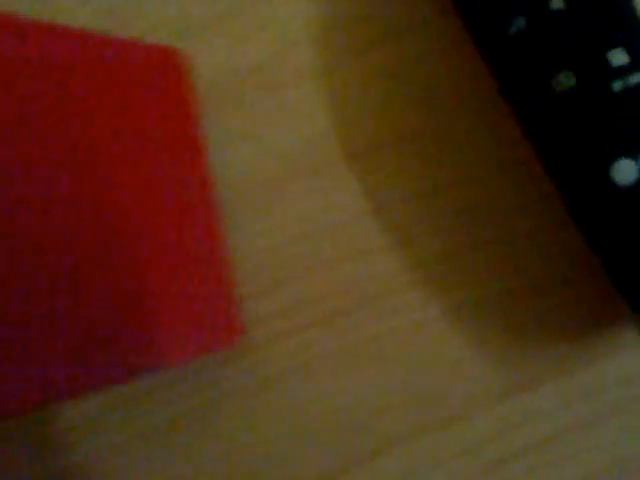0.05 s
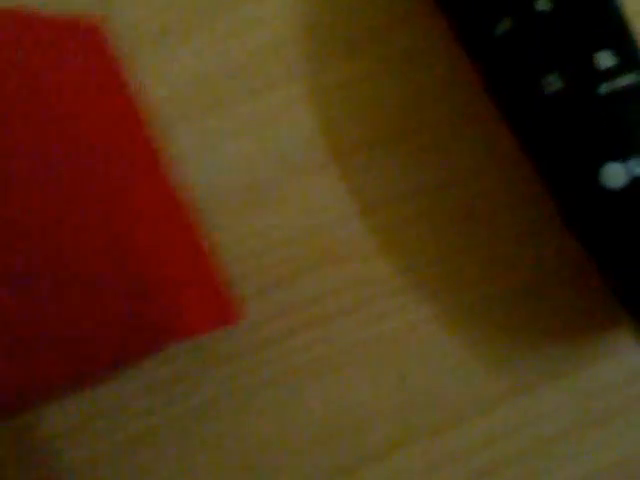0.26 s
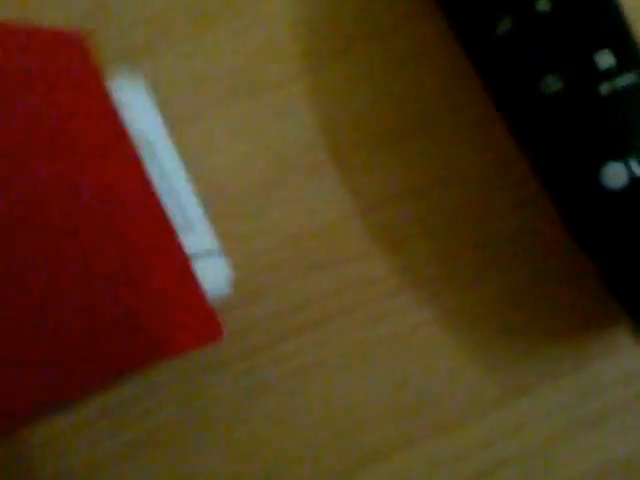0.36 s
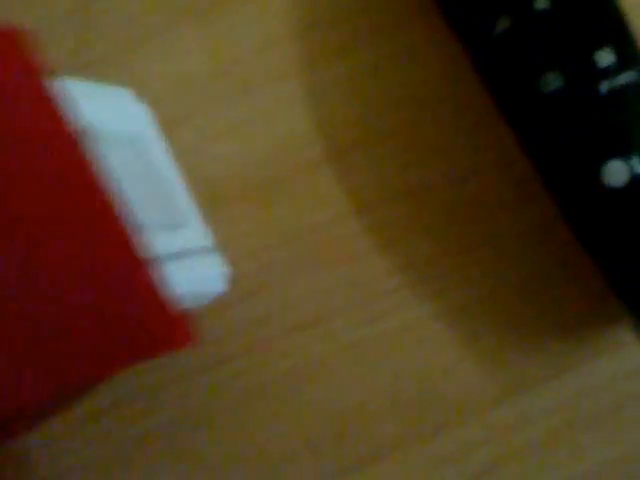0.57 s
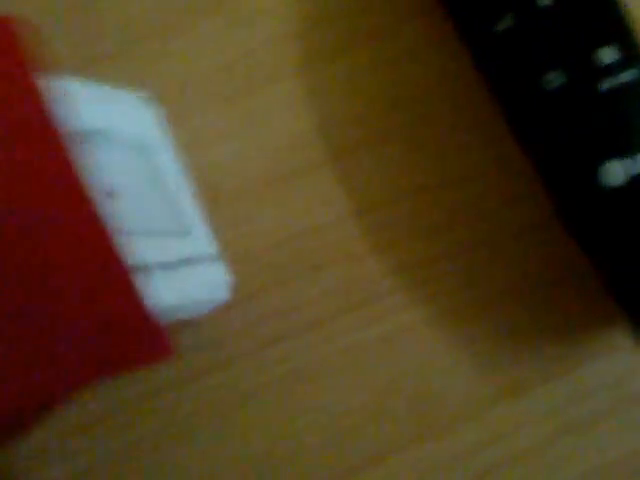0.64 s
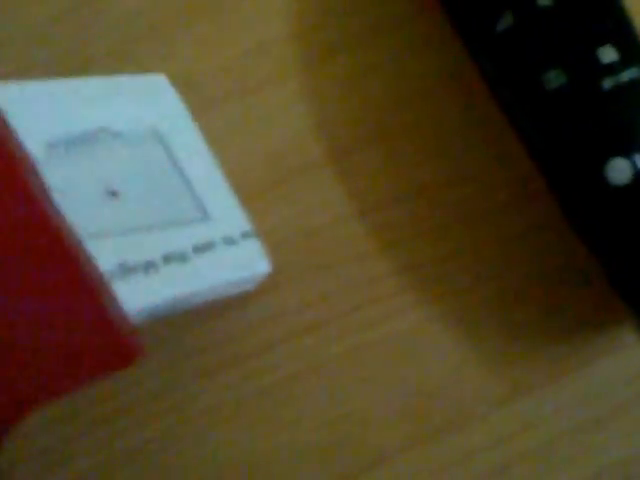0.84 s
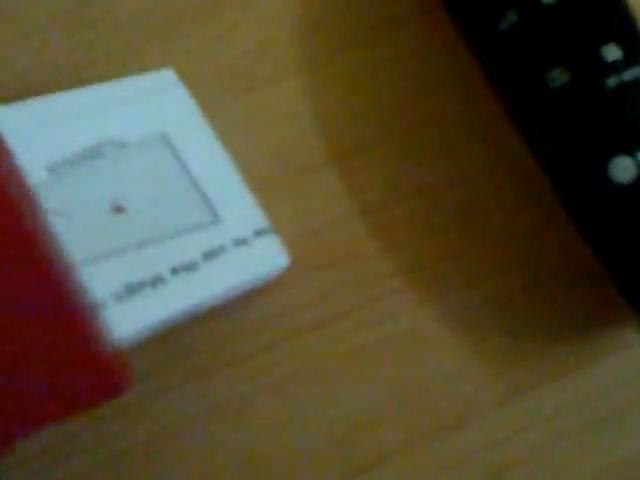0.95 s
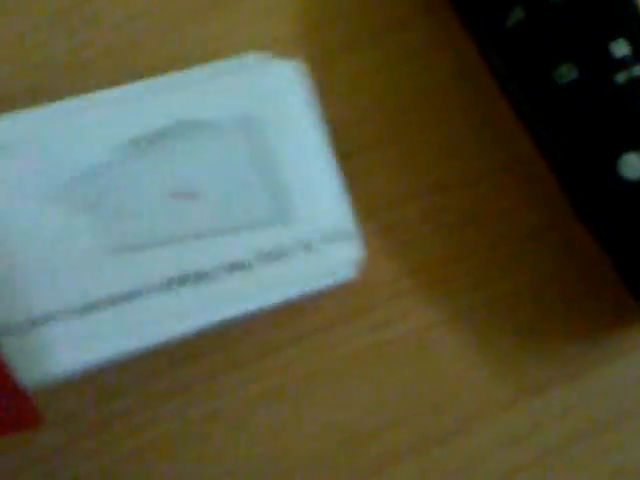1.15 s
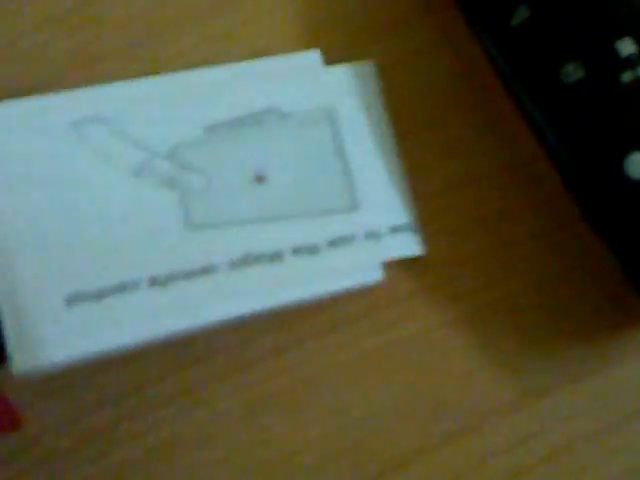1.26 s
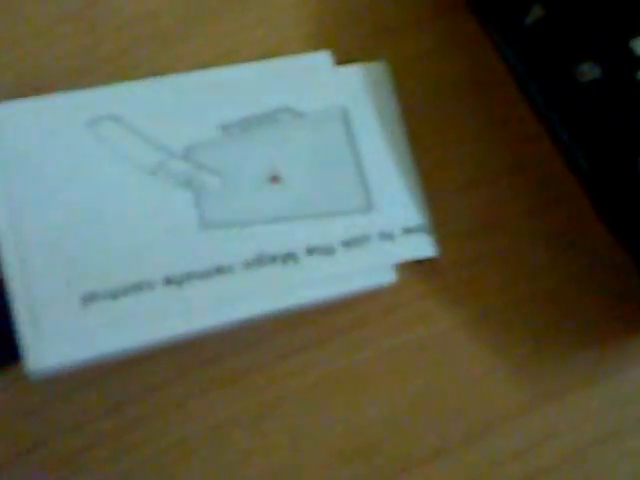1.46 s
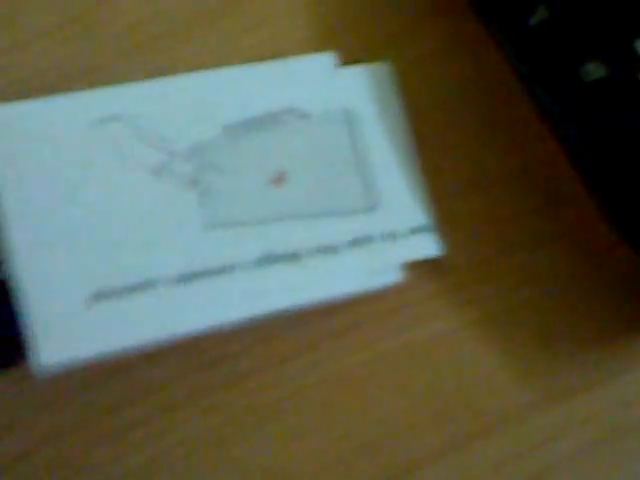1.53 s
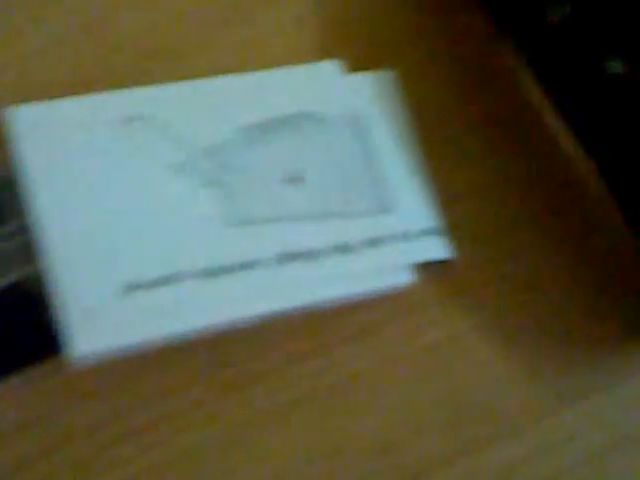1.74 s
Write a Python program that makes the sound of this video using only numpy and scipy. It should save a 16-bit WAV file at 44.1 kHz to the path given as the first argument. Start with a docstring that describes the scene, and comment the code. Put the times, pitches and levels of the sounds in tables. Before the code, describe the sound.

Hollow knocks come close to the microphone as a small holder is shifted and set down on a wooden tabletop. A card rustles between them and finishes with a few sharp ticks, over faint handling rumble in a quiet room.

```python
"""A quiet room, close to a wooden table: a small hard holder is shifted and set down while a card is
drawn out of it. Each knock is a crack at the contact, a clack and hollow ring of the holder, and a
ring of the table top. Between the knocks the card slides with a grainy rustle and its edges tick.
Low handling rumble and room tone lie underneath, and a short room tail follows the action."""
import sys
import numpy as np
from scipy import signal
from scipy.fft import rfft, irfft
from scipy.io import wavfile
from scipy.ndimage import uniform_filter1d

SR = 44100
rng = np.random.default_rng(int(sys.argv[2]) if len(sys.argv) > 2 else 0)


def transcribe(signal):
    """Save signal, clipped to [-1, 1], as a 16-bit WAV file at the path in sys.argv[1]."""
    frames = np.atleast_2d(signal).T
    limited = np.clip(frames, -1, 1)
    pcm = np.round(limited * 32767).astype(np.int16)
    wavfile.write(sys.argv[1], SR, pcm)


N = 79380

# The holder's hits on the table. Each row: start in seconds, hollow ring level in dB, its pitch in Hz,
# ring length as a multiple of the free ring, table gain in dB, wash gain in dB, clack gain in dB,
# clack tilt in dB per octave, crack gain in dB, top of the crack in Hz.
HOLDER_HITS = [(0.0661, -39, 636, .6, -45, -46, -20, 11, -22.5, 3950),
               (0.2515, -37, 620, 0.82, -26.5, -46, -19.5, 7, -21, 5000),
               (0.2735, -14, 712, 0.14, -44, -65, -47, -18, -61, 2500),
               (0.2943, -12.5, 667.6, 0.98, -13, -21, -7.5, -0.5, -11.5, 4800),
               (0.3066, -6, 653, 0.86, -17.5, -22.5, 1, 5.5, -10, 4800),
               (0.3780, -31, 654, 1.2, -33, -55, -25.5, 20.5, -24, 4240),
               (0.4045, -11.5, 710, 0.14, -16, -45, -25.5, -41, -23.5, 2500),
               (0.5303, -10.5, 663, 0.27, -27, -31, -5.5, -10, -11.5, 4200),
               (0.5428, -11.5, 595, 0.22, -6.5, -28.5, -24, 28, -14, 5100),
               (0.6145, -26, 632, 0.38, -25, -39, -22.5, -9, -28, 4000),
               (0.6785, -24.5, 659, 0.96, -27, -41, -32, -16.5, -34, 3900),
               (0.7738, -24, 752, 0.46, -28.5, -30.5, -20.5, 0, -31.5, 4780),
               (0.7985, -29.5, 728, 0.41, -38, -45, -25, -9, -30, 9000),
               (0.8790, -31.5, 694, 0.98, -29, -17.5, -26, -4, -17.5, 4400),
               (0.8853, -18, 720, 0.36, -18.5, -30, -8, 3.5, -3, 9000),
               (0.9070, -29, 690, 0.21, -15, -37, -7, 4, -2.5, 6100),
               (0.9665, -9.5, 679.3, 0.78, -14, -28.5, -7.5, 3, -26, 4500),
               (1.0100, -8.5, 672.4, 0.44, -7, -25.5, -3, 3, -16.5, 5200),
               (1.2592, -38.5, 650, 0.71, -52, -40, -23, 5.5, -29, 4900),
               (1.2922, -59, 610, 0.52, -45, -37.5, -30.5, -25.5, -34, 3920),
               (1.3245, -37, 690, 0.33, -29, -56, -25.5, -3, -26.5, 3820),
               (1.4045, -20.5, 676, 0.64, -28, -38, -22, 10.5, -41, 4060)]
def knocks():
    """Each hit sounds holder and table together; grip and position change the ring's pitch and length."""
    out = np.zeros(N)
    for s, hollow_db, hz, length, table_db, wash_db, clack_db, tilt_db, crack_db, top_hz in HOLDER_HITS:
        add(out, s, from_db(hollow_db) * hollow_ring(hz, length))
        add(out, s, from_db(table_db) * table_ring(length))
        add(out, s, from_db(wash_db) * table_wash())
        add(out, s, from_db(clack_db) * holder_clack(tilt_db))
        add(out, s, from_db(crack_db) * contact_crack(top_hz))
    return out


# The holder's short, hard modes. Each row: pitch in Hz, relative level in dB, t60 in seconds.
HOLDER_MODES = [(1140, -3.5, 0.006), (1213, 10.5, 0.017), (1377, 4, 0.022), (1556, 2.5, 0.022),
                (1726, -6.5, 0.045), (2017, 5, 0.016), (2330, -9.5, 0.043), (2905, -11, .016),
                (3333, -14, 0.0047)]
def holder_clack(tilt_db):
    """The hard shell clacks, its modes landing a little off pitch at every blow."""
    return .5 * struck(HOLDER_MODES, tilt_db, detune=0.036)


def hollow_ring(hz, length, rise_s=0.0021, free_t60=0.17):
    """The holder's hollow rings on a single note."""
    t = np.arange(SR // 2) / SR
    return np.sin(2 * np.pi * hz * t) * np.minimum(t / rise_s, 1) * decay(t, free_t60 * length)


def contact_crack(top_hz, attack_s=0.00027, hold_s=.002, t60=0.011):
    """A few milliseconds of bright chatter as two hard faces meet."""
    t = np.arange(SR // 20) / SR
    chatter = rng.standard_normal(len(t)) * np.minimum(t / attack_s, 1) * decay(t - hold_s, t60)
    bright = butter(chatter, 2270, "high")
    return rms_one(butter(bright, top_hz, "low", order=3)) / 10


# The table top's modes. Each row: pitch in Hz, relative level in dB, free-ringing t60 in seconds.
TABLE_MODES = [(74.1, -24, 0.68), (159.6, -15.5, 0.13), (262.8, -19, 0.42), (336, -15.5, 0.17),
               (385.7, -14, 0.25), (499, -12, 0.055), (730.5, -10.5, 0.21), (824, -8, 0.14),
               (917, -13, 0.19), (1113, -14.5, 0.12), (1162, -11, 0.18), (1413, -15.5, 0.123),
               (1541, -12, 0.16), (1866, -11, 0.161), (1900, -18, 0.084)]
def table_ring(length):
    """The wooden top rings under the blow and gives the knock its body."""
    return struck(TABLE_MODES, length=length)


# The colour of the table's dense modes. Each row: frequency in Hz, relative level in dB.
WASH_COLOUR = [(100, -27.5), (250, -19.5), (550, -1.5), (900, -4), (1200, 5.5), (1600, -9), (2000, -1.5),
               (2600, -8.5), (3100, -11), (6000, -27), (12000, -64)]
def table_wash(attack_s=0.01, t60=0.31):
    """The table's many overlapping modes build up and die away together."""
    t = np.arange(SR // 2) / SR
    wood = coloured(rng.standard_normal(len(t)), WASH_COLOUR)
    return wood * np.minimum(t / attack_s, 1) * decay(t, t60)


def struck(modes, tilt_db=0, length=1, detune=0, pivot_hz=1490, spread_db=1.5, contact_s=0.00059):
    """A struck body: decaying modes of alternating sign, balanced a little differently at every blow."""
    t, out = np.arange(SR // 2) / SR, 0
    for k, (hz, db, t60) in enumerate(modes):
        gain = from_db(db + tilt_db * np.log2(hz / pivot_hz) + spread_db * rng.standard_normal())
        pitch = hz * (1 + detune * rng.standard_normal())
        out = out + (-1) ** k * gain * np.sin(2 * np.pi * pitch * t) * decay(t, t60 * length)
    return out * np.minimum(t / contact_s, 1)


# The card's edge ticks. Each row: start in seconds, snap peak in dB, resonance in Hz,
# t60 of grit and fizz in seconds, fizz level in dB against the peak.
EDGE_TICKS = [(0.0350, -34, 3500, .015, -32), (0.1505, -23, 4030, 0.017, -46.5),
              (0.2906, -12, 3840, 0.016, -48), (0.4338, -17.5, 5300, 0.0088, -17),
              (0.4905, -23.5, 2300, 0.028, -32), (0.5896, -29, 4750, 0.035, -12.5),
              (0.667, -37, 3540, .015, -36), (0.7986, -12.5, 4950, 0.018, -24.5),
              (0.8848, -21, 7000, 0.003, -1), (0.8985, -13, 7000, 0.032, -26),
              (0.9790, -21, 4550, .008, -30), (0.987, -14.5, 4860, 0.0091, -22),
              (1.0098, -10, 5110, 0.017, -42), (1.2051, -16, 3960, 0.012, -23),
              (1.2133, -19, 5500, 0.016, -17), (1.249, -31, 3160, .01, -28),
              (1.2597, -17.5, 3270, 0.031, -40), (1.3770, -30.5, 3500, 0.019, -34),
              (1.4425, -2.5, 5100, 0.0039, -45), (1.4550, -13, 4630, 0.0071, -25),
              (1.4630, -26, 4500, 0.008, -30), (1.4772, -12.5, 4640, 0.011, -34),
              (1.4860, -16, 3500, 0.009, -27), (1.4960, -18.5, 3700, 0.0092, -25),
              (1.5020, -14, 3950, 0.0052, -26)]
def card_ticks(grit_db=-9.5):
    """A card edge snaps free: one short, broad resonance, a little grit and a fizz of fibres on top."""
    out, t = np.zeros(N), np.arange(SR // 20) / SR
    for s, db, hz, t60, fizz_db in EDGE_TICKS:
        push = from_db(grit_db) * rng.standard_normal(len(t)) * decay(t, t60)
        push[0] += 2  # the edge lets go
        snap = butter(resonate(push, hz, q=3.65), hz * 0.68, "low")
        fizz = from_db(fizz_db) * butter(rng.standard_normal(len(t)), hz, "high") * decay(t, t60)
        add(out, s, from_db(db) * (snap / np.abs(snap).max() + fizz))
    return out


# The card's strokes. Each row: start, attack, hold and time to fade by 30 dB, all in seconds,
# level in dB, tilt in dB per octave, card resonance in Hz.
CARD_STROKES = [(0.003, 0.0017, 0.0061, 0.082, -33.5, -2, 4300),
                (0.037, 0.03, 0.01, 0.014, -30, -3.5, 2240), (0.071, 0.012, 0.021, 0.041, -30.5, 0.5, 6300),
                (0.144, 0.0066, 0.012, 0.021, -33.5, -1, 4400), (0.182, 0.0039, 0.0075, .02, -33, -5, 4180),
                (0.197, 0.0058, 0.037, 0.061, -25.5, 2, 4700),
                (0.312, 0.0018, 0.0084, 0.14, -29, 2.5, 3700),
                (0.41, 0.009, 0.047, 0.19, -33.5, -2.5, 5660), (0.571, 0.013, 0.029, 0.079, -37, 0.5, 4740),
                (0.668, 0.0033, .018, 0.041, -35.5, -4, 2900), (0.765, 0.0088, .02, 0.036, -40, -1, 5000),
                (0.895, 0.0049, 0.027, .11, -26, 7.5, 4570), (1.187, .015, 0.073, 0.024, -42.5, -1.5, 3430),
                (1.257, 0.0055, 0.0037, 0.0035, -31, 13, 13900),
                (1.284, 0.0067, 0.033, 0.044, -34.5, -5.5, 3040),
                (1.351, 0.0045, 0.072, 0.055, -46.5, 2.5, 4200),
                (1.444, 0.0032, 0.069, 0.034, -34.5, 4, 3020)]
# The papery colour of the rub. Each row: frequency in Hz, relative level in dB.
RUB_COLOUR = [(100, -15), (400, -17), (900, 1.5), (1300, 2), (2100, 4.5), (2700, -0.5), (3800, -1.5),
              (5200, -8), (7000, -15), (10000, -25.5), (16000, -39)]
def card_slides(slips_per_s=3500, spread_db=3, hiss_db=-1.5, flutter_db=1.5, flutter_s=.003, ring_db=-1):
    """Card rubs on card and wood: tiny slips come in uneven clumps and ring the card."""
    out, t = np.zeros(N), np.arange(SR // 2) / SR
    for s, attack, hold, release, db, tilt_db, card_hz in CARD_STROKES:
        sizes = from_db(spread_db * np.minimum(rng.exponential(1, len(t)), 4))
        signs = rng.choice([-1, 1], len(t))
        slips = rms_one(sizes * signs * (rng.random(len(t)) < slips_per_s / SR))
        hiss = from_db(hiss_db) * rng.standard_normal(len(t))
        flutter = rms_one(uniform_filter1d(rng.standard_normal(len(t)), size=int(flutter_s * SR)))
        rub = (slips + hiss) * from_db(flutter_db * flutter)
        ring = from_db(ring_db) * resonate(rub, card_hz, q=9)
        envelope = np.minimum(t / attack, 1) * np.sqrt(decay(t - attack - hold, release))
        add(out, s, from_db(db) * envelope * coloured(rub + ring, RUB_COLOUR, tilt_db))
    return out


# The rumble's fader ride. Each row: time in seconds, level in dB.
RUMBLE_RIDE = [(0, -44), (.27, -51), (.31, -38.5), (.5, -41.5), (.68, -37), (.83, -52), (.92, -32.5),
               (1.049, -35.5), (1.171, -68), (1.32, -46), (1.46, -53), (1.62, -80), (1.8, -62)]
# Its bass-heavy colour. Each row: frequency in Hz, relative level in dB.
RUMBLE_EQ = [(25, -28), (50, -2), (70, -9), (100, -2.5), (170, -11), (250, -4.5), (400, -8.5), (700, -11),
             (1500, -47.5)]
def handling_rumble():
    """Low handling noise carried by the table."""
    times, db = np.transpose(RUMBLE_RIDE)
    level = from_db(np.interp(np.arange(N) / SR, times, db))
    return level * coloured(rng.standard_normal(N), RUMBLE_EQ)


# The colour of the room's tail. Each row: frequency in Hz, relative level in dB.
TAIL_COLOUR = [(100, -29.5), (600, -6.5), (1100, -5.5), (2200, -6.5), (3200, -13), (6000, -2.5),
               (14000, -9.5)]
# How long the tail hangs. Each row: frequency in Hz, t60 in seconds.
TAIL_DECAY = [(200, 0.17), (1000, 0.35), (2200, 0.35), (4000, 0.13), (12000, 0.32)]
def room_reverb(x, tail_db=-16.5, onset_s=0.0017, echo_s=.04, echo_db=-21):
    """A diffuse tail that dies band by band, and one dull wall echo."""
    t, tail = np.arange(SR // 2) / SR, 0
    edges = np.geomspace(80, 16000, 13)
    for low, high in zip(edges, edges[1:]):
        hz = np.sqrt(low * high)
        band = butter(rng.standard_normal(len(t)), [low, high], "band")
        tail = tail + band * from_db(at_hz(TAIL_COLOUR, hz)) * decay(t, at_hz(TAIL_DECAY, hz))
    tail = tail * (1 - np.exp(-(t / onset_s) ** 2))
    response = from_db(tail_db) * tail / np.sqrt(np.sum(tail ** 2))
    echo = butter(signal.unit_impulse(SR // 100), 2550, "low")
    add(response, echo_s, from_db(echo_db) * echo)
    return signal.fftconvolve(x, response)[:N]


# The dark bed of the room. Each row: frequency in Hz, relative level in dB.
ROOM_TONE_COLOUR = [(20, -12.5), (47, 8), (80, -3.5), (120, -4), (175, 3), (260, -1), (400, -13.5),
                    (650, -9.5), (1050, -2.5), (1500, -11.5), (2200, -17.5), (3200, -27.5), (6000, -37),
                    (10000, -50.5), (16000, -46)]
def room_tone(level_db=-42):
    """The room's steady, soft background noise."""
    return from_db(level_db) * coloured(rng.standard_normal(N), ROOM_TONE_COLOUR)


def from_db(db):
    """Decibels to gain."""
    return 10 ** (np.asarray(db) / 20)


def rms_one(x):
    """Scale to unit rms."""
    return x / np.sqrt(np.mean(x ** 2) + 1e-20)


def at_hz(points, hz):
    """Read a curve on a log-frequency axis."""
    freqs, values = np.transpose(points)
    return np.interp(np.log(np.maximum(hz, 1)), np.log(freqs), values)


def coloured(x, spectrum, tilt_db=0):
    """EQ a steady sound with a curve and a tilt per octave; rms 1."""
    hz = np.maximum(np.arange(len(x) // 2 + 1) * SR / len(x), 1)
    gain = from_db(at_hz(spectrum, hz) + tilt_db * np.log2(hz))
    return rms_one(irfft(rfft(x) * gain, len(x)))


def butter(x, hz, kind, order=2):
    """Causal Butterworth filter."""
    return signal.sosfilt(signal.butter(order, hz, kind, fs=SR, output="sos"), x)


def resonate(x, hz, q):
    """Ring a single resonance."""
    return signal.lfilter(*signal.iirpeak(hz, q, fs=SR), x)


def decay(t, t60):
    """Exponential fall, 60 dB in t60 seconds; full level before time zero."""
    return np.exp(-np.log(1000) * np.maximum(t, 0) / t60)


def add(out, s, sound):
    """Mix a sound in at s seconds."""
    i = int(s * SR)
    out[i:i + len(sound)] += sound[:N - i]


def scene():
    """Knocks, ticks and rustles in the room, over rumble and room tone, in mono."""
    handling = knocks() + card_ticks() + card_slides()
    bed = room_tone()
    return (handling + room_reverb(handling) + handling_rumble() + bed)[None]


def record(dry, low_cut_hz=25.4, ceiling=.95, high_cut_hz=16150):
    """The deepest bass is lost, the loudest peaks are rounded and the top is cut."""
    x = butter(dry, low_cut_hz, "high")
    rounded = x / (1 + (x / ceiling) ** 6) ** (1 / 6)
    return signal.sosfilt(signal.ellip(10, .2, 80, high_cut_hz, fs=SR, output="sos"), rounded)


dry = scene()
out = record(dry)
transcribe(out)
```